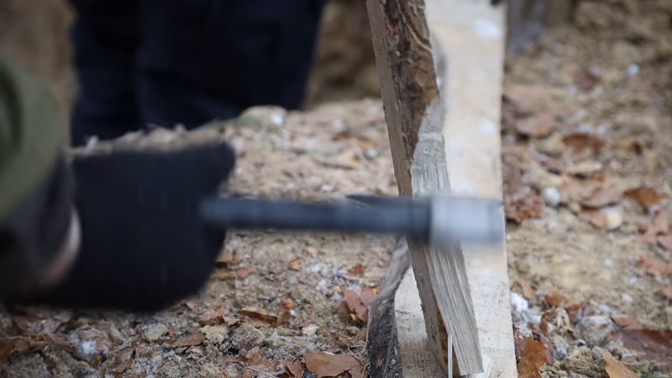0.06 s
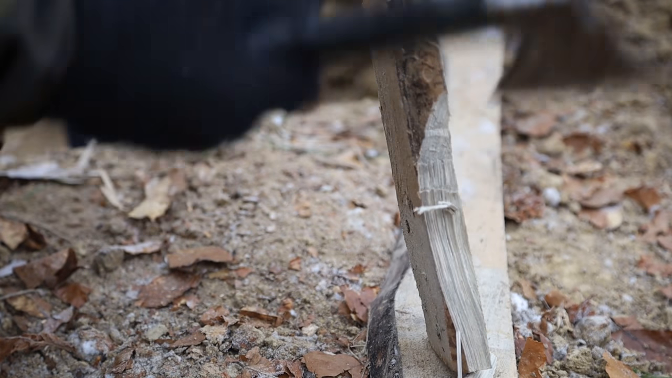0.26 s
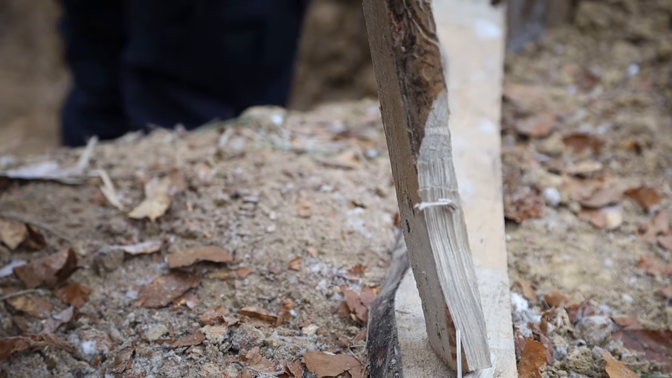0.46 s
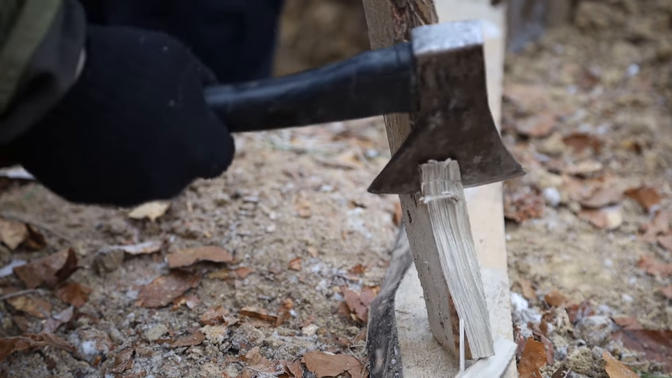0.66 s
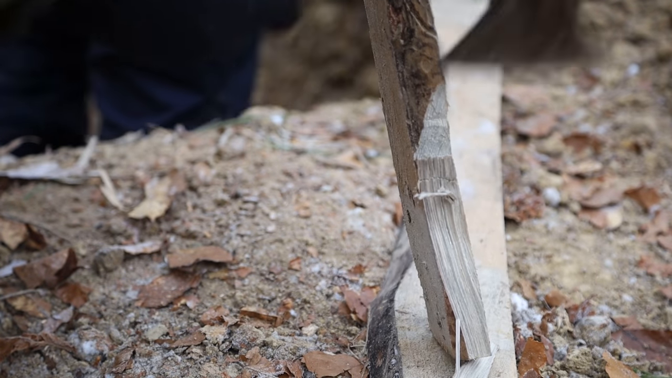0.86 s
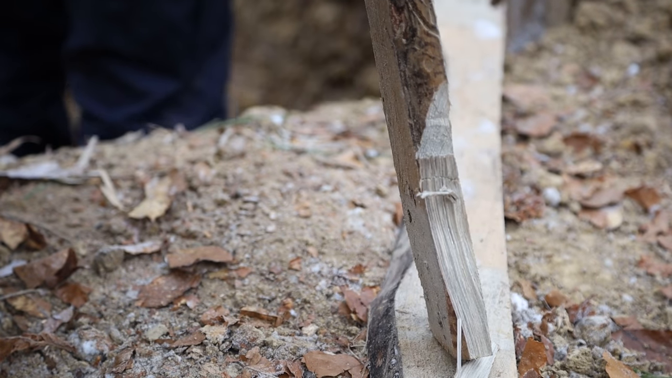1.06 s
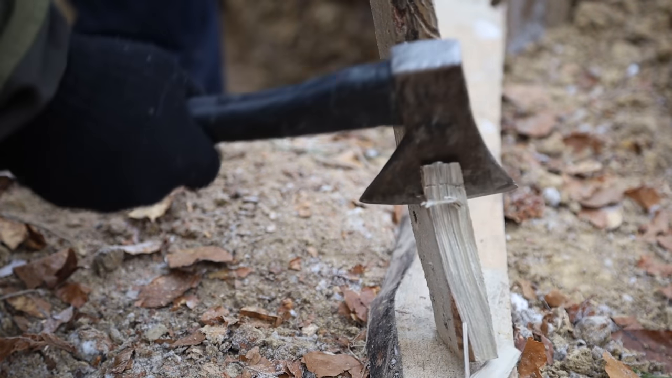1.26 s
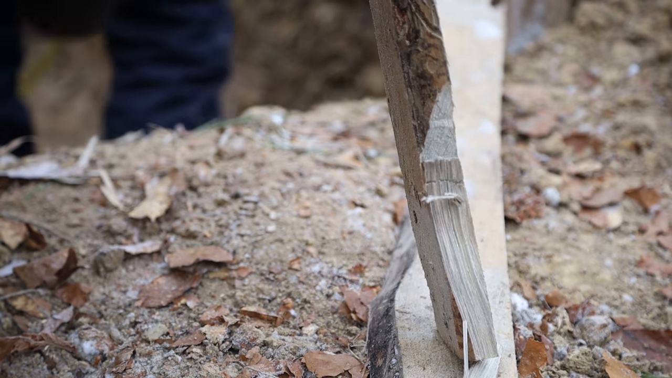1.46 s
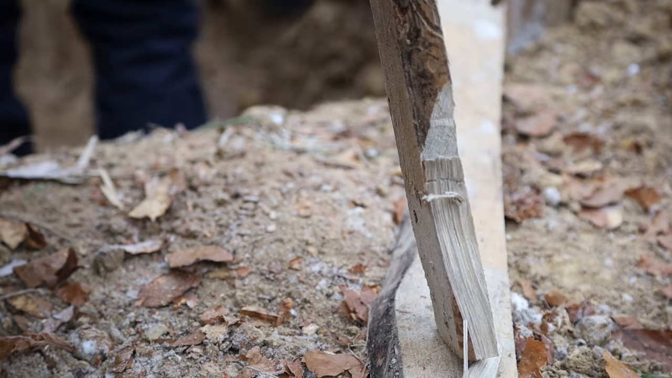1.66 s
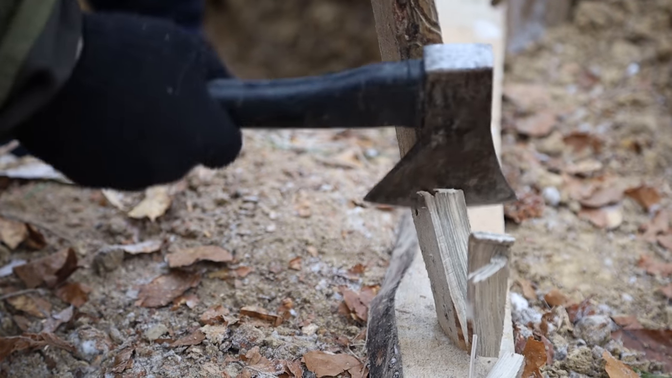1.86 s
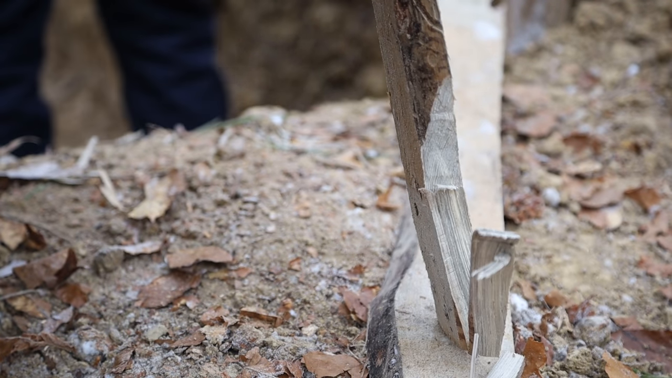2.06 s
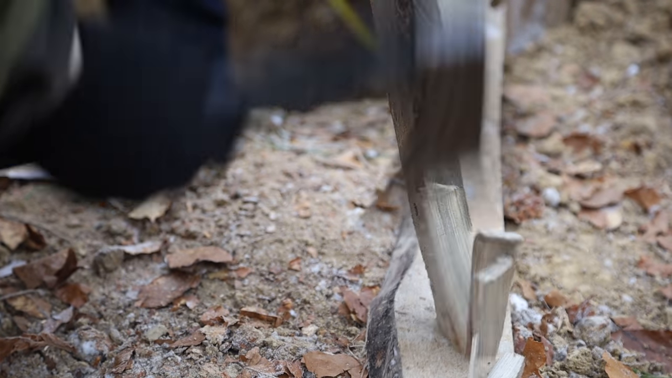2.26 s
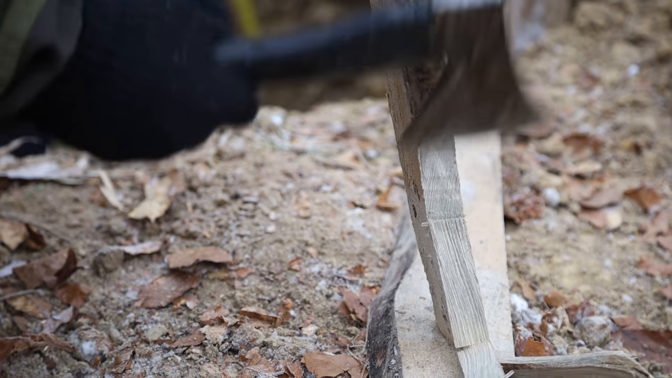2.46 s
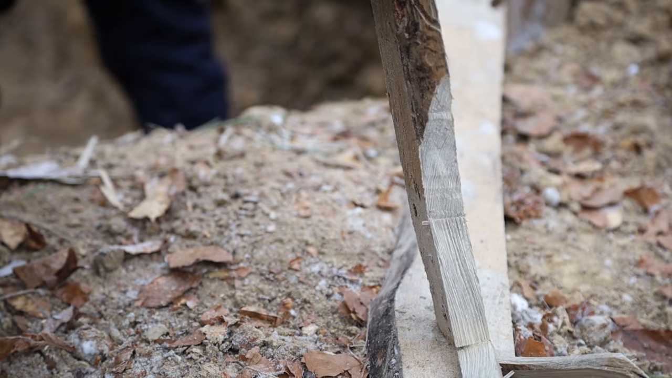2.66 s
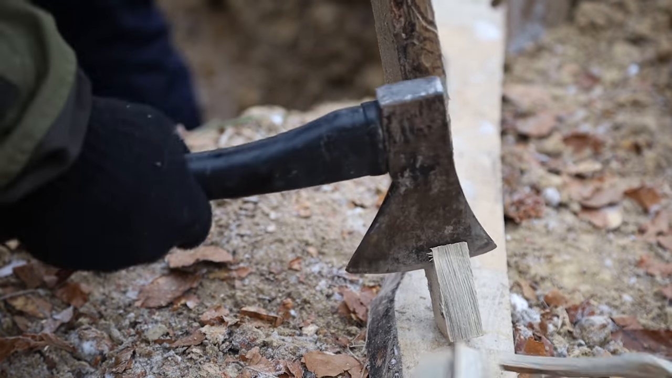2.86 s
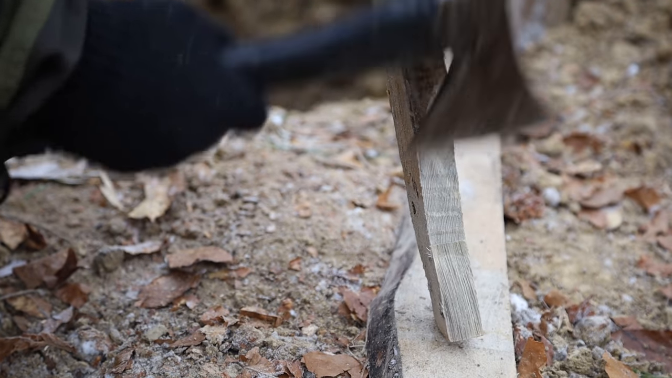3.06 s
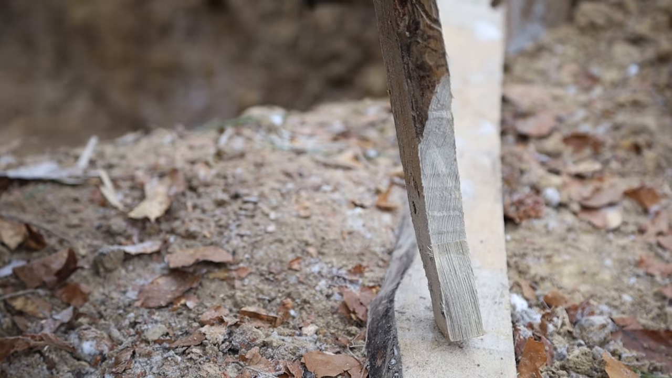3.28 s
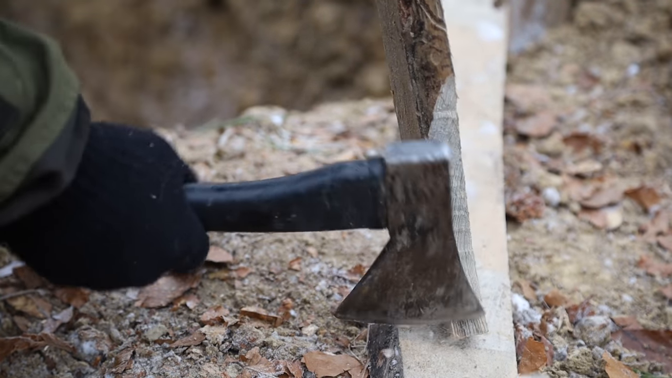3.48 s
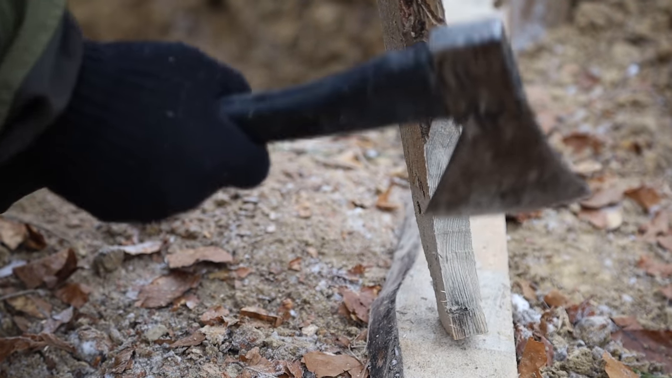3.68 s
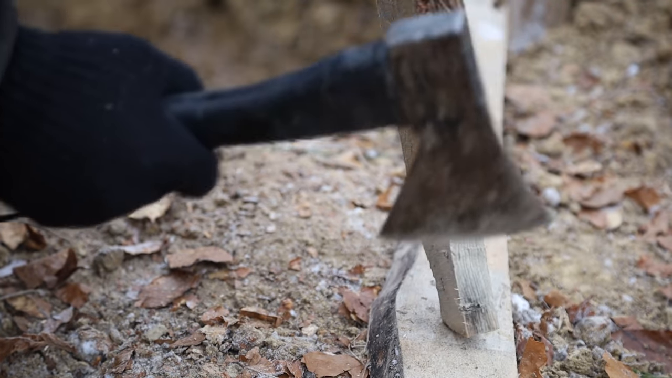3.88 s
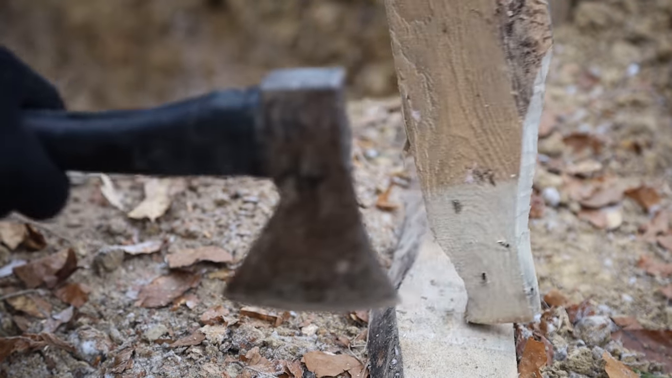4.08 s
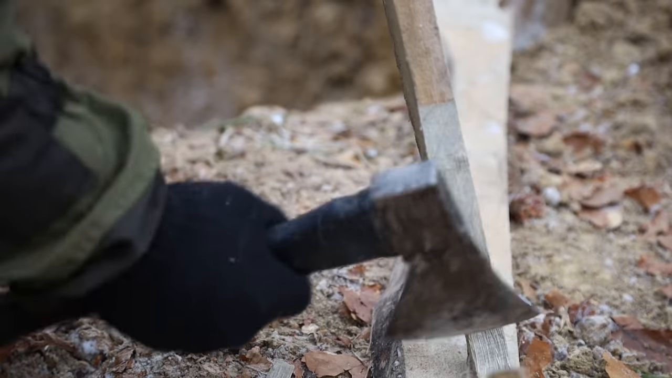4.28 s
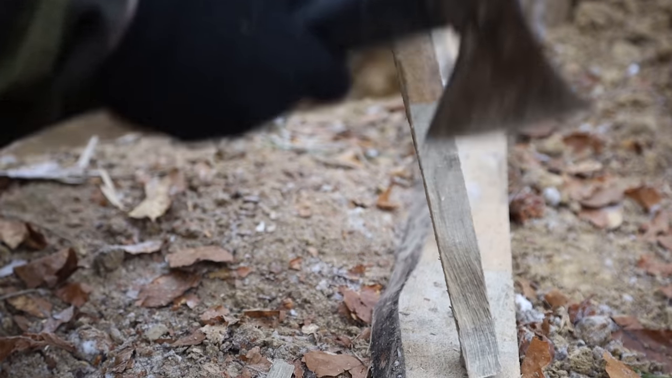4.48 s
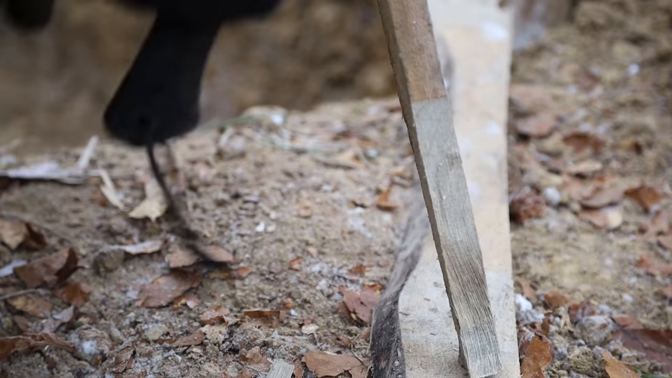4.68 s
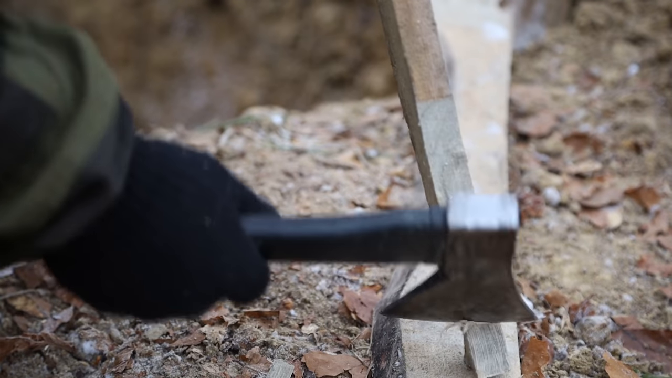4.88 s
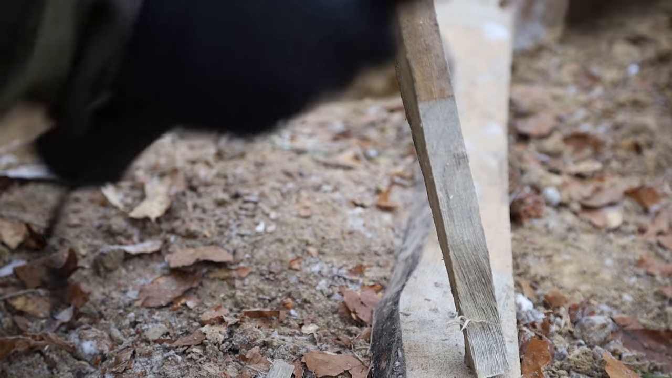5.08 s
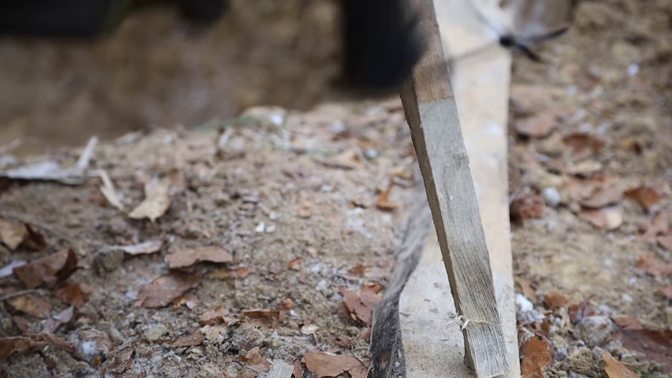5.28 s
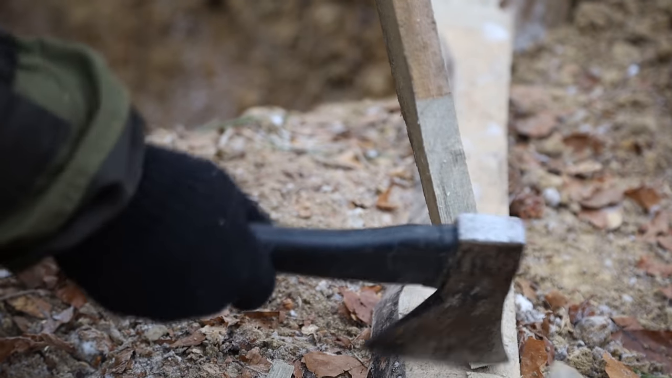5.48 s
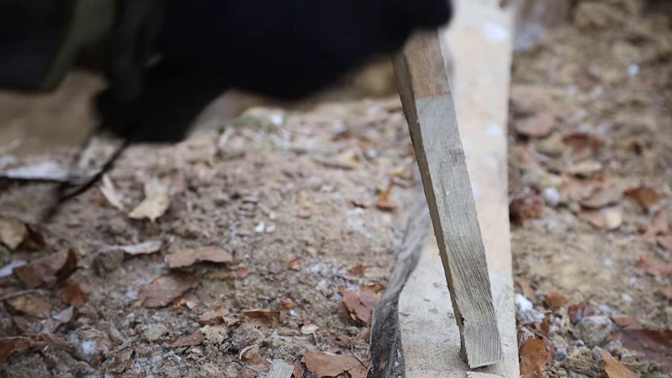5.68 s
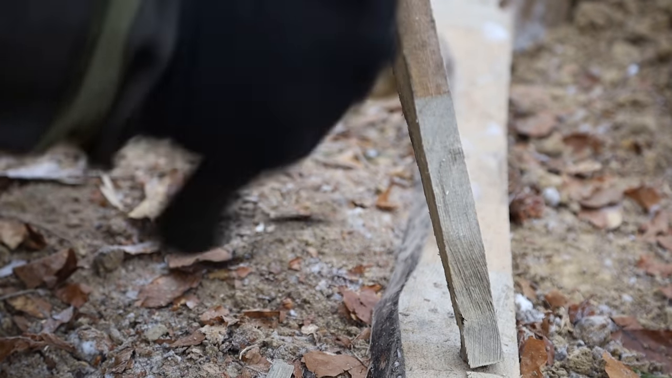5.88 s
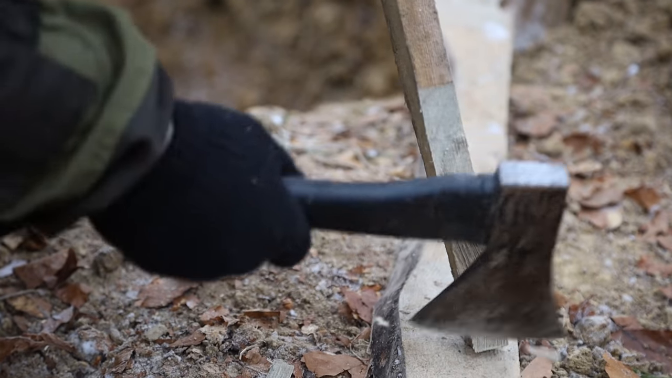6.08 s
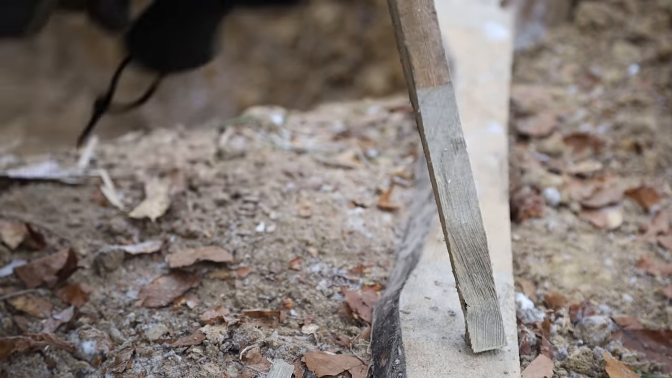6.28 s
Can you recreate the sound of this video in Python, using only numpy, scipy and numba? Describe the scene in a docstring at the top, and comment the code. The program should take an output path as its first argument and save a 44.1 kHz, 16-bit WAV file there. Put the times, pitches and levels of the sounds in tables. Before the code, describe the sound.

Close to the microphone, a hatchet hews a wooden stake propped on a plank. It opens with crisp splintering and cloth swishes, then come dry, punchy knocks at uneven gaps of about half a second, some doubled. Fibres rip as chips come loose, the stake scrapes and clatters as it is turned, and the blade sometimes rings thinly. Quiet outdoor air lies behind, and the loudest hits clip.

```python
"""A hatchet hews a wooden stake standing on a plank in a wood, close to a camera microphone.
Each blow is a cluster: tearing fibres are dense clicks, knocks ring the stake's modes, the freed blade rings on.
A sleeve and leaves swish as filtered noise; the stake, turned and dragged, scrapes as rubbed modes.
Behind lie quiet coloured air and a short scatter from ground and trunks. The recorder overloads and its
gain control ducks."""
import sys
import numpy as np
from scipy import signal
from scipy.fft import rfft, irfft, next_fast_len
from scipy.io import wavfile
from scipy.ndimage import uniform_filter1d
from numba import njit

SR = 44100
rng = np.random.default_rng(int(sys.argv[2]) if len(sys.argv) > 2 else 0)


def wav_out(sig):
    """Save sig, one row per channel (or a flat mono array), as 16-bit PCM at SR to the path in sys.argv[1]."""
    wavfile.write(sys.argv[1], SR, np.round(np.clip(np.atleast_2d(sig).T, -1, 1) * 32767).astype(np.int16))


N = 279594

# modes of the stake: (f/Hz, level/dB, t60/s before the ring length factor)
STAKE = [(150, -8, .08), (242, -6, .07), (360, -5, .07), (460, -4, .06), (590, -2, .06), (710, 0, .055),
         (835, -1, .055), (990, -3, .05), (1150, -4, .05), (1430, -6, .045), (1570, -6, .045),
         (1850, -10, .04), (2190, -13, .035), (3000, -16, .025)]
# modes of the hatchet blade: (f/Hz, level/dB, t60/s before the ring length factor)
BLADE = [(4810, -4.5, 0.14), (5450, -16.5, 0.012), (7300, -11.5, .03)]
# spectrum of cracking fibres: (f/Hz, relative level/dB per Hz)
CRACK = [(880, -23), (1500, 16.5), (2490, 8.5), (3130, 8.5), (6540, -1.5), (8650, 0.5), (9750, -27.5),
         (13500, -6.5), (16200, -32)]


def undb(db):
    """Decibels to gain."""
    return 10 ** (np.asarray(db) / 20)


def unit(x):
    """Scale to rms 1."""
    return x / np.sqrt(np.mean(x ** 2))


def coloured(points):
    """Noise with a spectrum drawn through (f/Hz, level/dB) points, rms 1."""
    hz, db = np.transpose(points)
    size = next_fast_len(N)
    f = np.fft.rfftfreq(size, 1 / SR) + 1  # + 1 Hz keeps the logarithm finite
    shape = undb(np.interp(np.log(f), np.log(hz), db))
    return unit(irfft(rfft(rng.standard_normal(size)) * shape, size)[:N])


def band(x, hz, width_hz):
    """Two-pole resonance, gain 1 at the centre."""
    return signal.lfilter(*signal.iirpeak(min(hz, .45 * SR), max(hz / width_hz, .3), fs=SR), x)


def ring(t, modes, gains, detune, linger=0.82):
    """Sum of decaying modes; linger is the ring length factor on every t60."""
    hz, db, t60 = np.array(modes, float).T[:, :, None]
    fade = undb(-60 * t / (t60 * max(linger, .2)))
    tone = np.sin(2 * np.pi * hz * detune[:, None] * t)
    return np.sum(gains[:, None] * undb(db) * tone * fade, axis=0)


def blade_ring(t):
    """The blade's modes, struck once and dying away."""
    return ring(t, BLADE, np.ones(len(BLADE)), np.ones(len(BLADE)))


def add(out, s, x):
    """Mix x into out at s seconds."""
    i = int(s * SR)
    out[i:i + len(x)] += x[:N - i]


def walk(count):
    """Random levels, count per second, slewed from one to the next; spread near 1."""
    k = int(SR / count)
    levels = np.repeat(rng.standard_normal(N // k + 1), k)
    return 1.25 * uniform_filter1d(levels, k)[:N]


def grains(rate, spread_db):
    """Random clicks, rate per second on average, a few much louder than the rest; rms 1."""
    size = undb(spread_db * rng.exponential(size=N)) * np.sign(rng.standard_normal(N))
    return unit(size * (rng.random(N) < rate / SR))


def wood_air():
    """Quiet air of the wood; its hiss drops out briefly after two heavy blows, treble most."""
    # spectrum of the air: (f/Hz, relative level/dB per Hz)
    air_points = [(12, -35), (20, -10.5), (102, -8), (146, -10.5), (286, -7.5), (348, -4.5), (461, -6.5),
                  (628, -7), (785, -3), (1450, -7), (3190, -14), (8500, -17), (13700, -26.5), (16200, -31)]
    # dropouts: (t/s, treble level/dB, time until the return/s, return/s)
    hush_rows = [(3.51, -7, 0.13, 0.12), (6.047, -13.5, 0.082, 0.088)]
    t = np.arange(N) / SR
    air = coloured(air_points) * undb(-48.5 + 0.32 * walk(count=5))
    low = signal.lfilter(*signal.butter(2, 1800., fs=SR), air)
    hush_db = 0
    for s, db, hold, back in hush_rows:
        hush_db = hush_db + np.interp(t, [s, s + .03, s + hold, s + hold + back], [0, db, db, 0])
    return low * undb(0.29 * hush_db) + (air - low) * undb(hush_db)


def swells(rows, tilt=0, offset_db=0.):
    """Gain of a series of rubs: each climbs to its peak and dies away; tilt weighs their brightness."""
    swell_db = 20  # what a rub gains over its rise and loses over its fall
    t, power = np.arange(0, N, 64) / SR, 0
    for s, db, rise, fall, *bright in rows:
        away = np.where(t < s, (s - t) / max(rise, .005), (t - s) / max(fall, .005))
        power = power + undb(db + offset_db + tilt * sum(bright) - swell_db * away) ** 2
    return np.interp(np.arange(N) / SR, t, np.sqrt(power))


def rustle():
    """Cloth swish in fixed resonances, an airy top, a crunchy middle, and dragged wood rubbing the stake modes."""
    # swishes of sleeve and leaves: (loudest at t/s, level/dB, rise/s, fall/s, brightness/dB: + airy, - crunchy)
    swish_rows = [(.133, -28, 0.051, 0.043, 5), (.165, -34.5, .04, 0.12, -2), (.21, -30.5, .015, .06, 0),
                  (.252, -43, .04, .015, -20), (.86, -44.5, .08, .1, -15), (.952, -30.5, 0.14, 0.9, -9),
                  (1.162, -36, .04, .09, -15.5), (1.27, -41, 0.05, 0.078, 1), (1.33, -32, .04, 0.11, 3),
                  (1.4, -33.5, .1, .12, -2.5), (1.492, -28.5, 0.083, 0.076, -0.5),
                  (1.614, -36, .05, .07, 0.5), (1.708, -30, .1, .1, -1.5), (1.77, -30, .1, .05, -7),
                  (1.96, -31, .14, .2, 1), (2.04, -29.5, 0.21, 0.1, 3), (2.092, -48.5, .15, .15, 13),
                  (2.17, -34, .05, .1, 2), (2.29, -37.5, .05, .06, -0.5), (2.504, -36, .04, .04, 0.5),
                  (3.098, -34.5, .04, .07, -3.5), (3.724, -39, .025, .05, -15), (3.802, -40.5, .05, .1, -1),
                  (3.968, -30, .02, .015, 1), (4.072, -47, .15, .3, -6), (4.524, -36.5, .1, .04, 4.5),
                  (4.566, -31.5, .015, .05, 5), (4.644, -41, .05, .08, 14), (4.76, -37.5, .1, .4, -2),
                  (5.048, -42, .04, .07, -5.5), (5.114, -39.5, .015, .025, -10), (5.28, -48.5, .5, .15, -2),
                  (6.288, -31.5, .02, 0.022, 7.5), (6.27, -54, 0.087, .1, 2)]
    # the stake scrapes on the plank: (loudest at t/s, level/dB, rise/s, fall/s)
    drag_rows = [(.14, -40.5, 0.089, 0.12), (.96, -40.5, 0.11, 0.5), (1.14, -36.5, 0.067, 0.13),
                 (1.33, -43.5, 0.15, 0.7), (1.45, -48.5, .1, 0.064), (1.77, -33, 0.067, 0.15),
                 (2.03, -37, 0.1, 0.19), (2.32, -39.5, 0.12, .05), (2.44, -40.5, 0.077, 0.055),
                 (3.07, -39, 0.084, .12), (3.15, -46, 0.069, 0.56), (3.802, -37, 0.075, 0.14),
                 (3.965, -46, .1, 0.12), (4.072, -37, 0.19, 0.18), (4.4, -35.5, 0.15, 0.067),
                 (4.5, -29, 0.025, 0.064), (4.53, -28.5, 0.07, 0.049), (4.566, -27.5, 0.014, 0.06),
                 (4.644, -24, 0.023, 0.035), (4.75, -35.5, 0.3, 0.28), (5.29, -46, 0.82, 0.044),
                 (6.33, -42.5, 0.068, .05)]
    # resonances of the cloth: (f/Hz, half the bandwidth/Hz, level/dB)
    cloth_bands = [(3930, 150, -17.5), (4620, 500, 10), (7580, 840, 17.5), (9100, 64, -8.5)]
    swish = swells(swish_rows)
    airy = swells(swish_rows, tilt=0.84, offset_db=-3.5)
    crunchy = swells(swish_rows, tilt=-0.53, offset_db=-10.5)
    dragged = swells(drag_rows)
    rub = rng.standard_normal(N) + .5 * grains(1500., spread_db=2.5)
    flicker = [undb(2.2 * walk(rate)) for rate in (14, 19, 25, 33, 45)]

    broad = unit(band(band(rub, 4380.0, 5300.0), 5730.0, 3600.0))
    cloth = np.zeros(N)
    for k, (f, half_width, db) in enumerate(cloth_bands):
        cloth += undb(db) * flicker[k % 3] * unit(band(rub, f, 2 * half_width))
    top = unit(band(band(rub, 8700.0, 8900.0), 18000.0, 4700.0)) * flicker[2]
    crunch = unit(band(band(rub, 2900.0, 2500.0), 2300.0, 3500.)) * flicker[3]
    drag = np.zeros(N)
    for k, (f, db, _) in enumerate(STAKE):
        drag += undb(1.3 * db) * flicker[k % 5] * unit(band(rub, f, f / 8))
    sleeve = unit(broad + 1.1 * unit(cloth)) * flicker[4]
    return swish * sleeve + airy * top + crunchy * crunch + dragged * unit(drag)


def tears(focus=0.55, blade_db=-62):
    """Dense clicks of fibres parting: a swell of the given length with a short tail, over a barely present blade ring."""
    # bursts of tearing fibres: (t/s, peak level/dB, brightest f/Hz, length/s)
    tear_rows = [(0.0834, -31, 6800, 0.0018), (0.092, -25.5, 4500, .00074), (0.1096, -9.5, 11600, 0.0015),
                 (0.115, -19.5, 9000, 0.00074), (0.1282, -6.5, 5500, 0.0012), (0.133, 2, 4860, 0.00045),
                 (0.1424, -17, 4830, .0012), (0.1845, -21, 12000, .001), (0.2105, -4, 6600, 0.0025),
                 (0.2298, -15.5, 4370, 0.011), (0.2428, -16.5, 6440, 0.0063), (0.6591, 3.5, 3150, 0.0028),
                 (0.7931, -22, 4060, 0.0026), (0.805, -24.5, 4660, 0.0038), (0.849, -21, 4400, 0.0011),
                 (1.2872, -2, 3500, 0.0049), (1.782, -6, 7750, 0.033), (1.798, -18, 8600, .014),
                 (1.822, 0, 5170, .003), (1.97, -24.5, 5540, 0.00082), (2.032, -11.5, 8460, 0.063),
                 (2.2485, -15.5, 8500, 0.018), (2.331, -17, 7600, 0.024), (2.3613, -6, 3370, 0.0064),
                 (2.9157, 5, 3210, 0.0044), (2.9365, -15.5, 7550, 0.0081), (3.0924, -25, 4480, 0.014),
                 (3.5118, -1.5, 3500, .0045), (3.7084, -23.5, 7620, .0015), (3.7114, -26.5, 3390, 0.0021),
                 (3.724, -23.5, 3260, 0.00057), (4.198, -30, 9500, 0.0026), (4.307, -13.5, 3100, 0.011),
                 (4.36, -26, 7400, 0.0036), (4.5361, -18.5, 4900, 0.00098), (4.9554, -1.5, 2600, 0.0038),
                 (5.4785, 3.5, 3800, 0.0044), (6.039, -15, 2820, 0.0037), (6.2422, -33, 8000, 0.0012),
                 (6.279, -21.5, 4970, 0.0053), (6.2907, -7.5, 4750, 0.00089)]
    out = np.zeros(N)
    fibres = .6 * grains(9000., spread_db=2.0) + coloured(CRACK)
    for s, db, hz, length in tear_rows:
        length = max(length, .0007)
        t = np.arange(int(6 * length * SR)) / (length * SR)  # in burst lengths
        i = int(s * SR)
        raw = np.diff(fibres[i - 1:i + len(t)])
        x = (1 - focus) * unit(raw) + focus * unit(band(raw, hz, hz / 3))
        swell = np.minimum(5 * t, 1) * np.exp(-np.maximum(t - 1, 0) * 2.2)
        x = x * swell[:len(x)]
        add(out, s, undb(db) * x / np.abs(x).max())
    blade = blade_ring(np.arange(SR // 20) / SR)
    return out + undb(blade_db) * signal.fftconvolve(out, blade)[:N]


def pings():
    """The blade springs free of the wood and rings in its own decaying modes."""
    # (t/s, level/dB)
    ping_rows = [(0.134, -26), (3.498, -23), (4.299, -12), (6.034, -31)]
    out = np.zeros(N)
    blade = blade_ring(np.arange(SR // 4) / SR)
    for s, db in ping_rows:
        add(out, s, undb(db) * blade)
    return out


def knocks(blade_db=-42, gain_db=-0.5, thud_db=-26, thud_hz=76.0, thud_t60=0.1):
    """Each knock rings the stake modes near its pitch; the loose stake chatters on, fibres crack, the ground thuds."""
    # knocks on wood: (t/s, level/dB before gain_db, loudest f/Hz, crack level/dB re knock,
    # breadth/octaves, ring length factor: longer when the stake hangs free)
    knock_rows = [(0.163, -28, 1500, -2, 0.49, 0.35), (0.2045, -20.5, 890, 2.5, 0.083, 0.54),
                  (0.234, -28.5, 910, -9, 0.21, 0.64), (0.464, -43, 423, -19, 0.36, 0.41),
                  (0.6568, 6.5, 687, -1.5, 0.59, 0.15), (0.751, -37, 1080, -16, .39, 0.38),
                  (1.126, -22, 190, -27, 1, 0.18), (1.152, -28.5, 182, -24, 0.37, 0.58),
                  (1.2873, 0, 610, 0, 0.3, 0.27), (1.293, -2.5, 713, -15, 0.53, 0.27),
                  (1.306, -19, 746, -7.5, 0.96, .9), (1.824, -1, 684, 4, 1, 0.38),
                  (1.829, 0, 860, -14.5, 0.26, 0.18), (1.848, -4, 825, -22, 0.74, 0.24),
                  (2.359, 2, 490, 7, 0.36, 0.18), (2.364, -1.5, 500, -15, 0.67, 1.1),
                  (2.381, -9.5, 800, -1, 0.76, 0.72), (2.53, -29.5, 189, -1.5, 0.84, 1.75),
                  (2.916, 6, 676, -7, 0.22, 0.86), (2.92, 4, 825, -14.5, 0.39, 0.15),
                  (2.956, -19.5, 1240, 0, 0.25, 1), (2.966, -19.5, 680, -3.5, .32, 0.69),
                  (3.039, -23.5, 1050, 3, 0.23, 0.46), (3.074, -33.5, 680, -14, 0.36, 1.1),
                  (3.087, -26, 700, -13, 0.36, 0.59), (3.119, -39, 524, 15, 0.54, 0.72),
                  (3.166, -30, 160, -11, .3, 2.3), (3.209, -23.5, 151, -10, 0.75, 0.67),
                  (3.415, -26.5, 284, -7.5, 0.62, 0.92), (3.4971, 10, 727, -11, 0.37, 0.2),
                  (3.508, -14.5, 710, 15.5, 0.96, 1), (3.5243, 11, 990, -18.5, 0.48, 0.38),
                  (3.593, -38.5, 285, 5, 0.68, 0.47), (3.747, -30, 252, 8, .95, 0.67),
                  (3.795, -16, 221, -18.5, 0.37, 0.48), (3.827, -26.5, 193, 6.5, 0.57, 2),
                  (3.914, -37, 1210, 9, 0.35, 0.61), (3.965, -21.5, 270, 3.5, 0.24, 0.41),
                  (4.051, -32, 1090, 0.5, .95, 0.23), (4.156, -27, 590, -22, 0.23, 4.2),
                  (4.297, 3.5, 710, 3, .22, 0.27), (4.3252, 9, 1280, -8.5, 0.77, 0.35),
                  (4.453, -21.5, 940, -17, 1, 1.1), (4.494, -12, 450, -16.5, 1, 1.6),
                  (4.524, -7, 1035, -35, 0.23, 0.52), (4.538, -18, 352, -22, 0.087, 1.5),
                  (4.631, -18.5, 700, -7, .7, 1.8), (4.719, -32, 363, -23, 0.14, 1.7),
                  (4.787, -13.5, 450, -20, 0.84, 1.84), (4.804, -17, 756, -23, 1, 1),
                  (4.9494, -7.5, 790, -2.5, 0.33, 1.9), (4.961, 4, 730, -7, 1, 0.3),
                  (4.983, -13.5, 162, -13, 0.64, 0.6), (5.4712, 0, 724, 4.5, 0.11, 0.95),
                  (5.4937, 3.5, 893, -27.5, .5, .55), (5.739, -42, 1030, 9.5, .31, .79),
                  (5.9595, -36.5, 1155, 3, 0.2, 0.78), (6.0324, 6, 720, 1, 0.087, 0.61),
                  (6.0454, 10, 1170, -13.5, 0.27, 0.55), (6.288, -34.5, 913, 10.5, 0.17, 0.82),
                  (6.315, -32, 1120, -10, 1, 0.44)]
    chatter_db, chatter_s = -13.5, 0.016  # level re a knock of 0 dB, duration
    chatter_slope = -0.24  # dB per dB of knock: light handling is more chatter than knock
    out, t = np.zeros(N), np.arange(SR // 6) / SR
    crack = coloured(CRACK)
    judder = grains(2600., spread_db=3.5)
    ground = unit(band(rng.standard_normal(N), thud_hz, 100.0))
    mode_hz = np.array(STAKE)[:, 0]
    chance = rng.standard_normal((len(knock_rows), 2, len(STAKE)))
    blade = blade_ring(t)
    for (s, db, hz, crack_db, breadth, linger), (size, tune) in zip(knock_rows, chance):
        # where it is struck decides which modes speak
        near = np.exp(-np.abs(np.log2(mode_hz / hz)) / max(breadth, .1))
        wood = ring(t, STAKE, near * undb(2. * size), 1 + .02 * tune, linger)
        push = np.hanning(int(.14 * SR / hz) + 3)  # a soft contact lasts part of a cycle
        wood = np.convolve(wood, push)[:len(t)]
        # a thin stake radiates little bass
        wood = signal.lfilter(*signal.butter(2, hz / 3, "high", fs=SR), wood)

        i = min(int(s * SR), N - len(t))  # keeps the noise slices whole near the end
        shakes = judder[i:i + len(t)] * np.exp(-(t / chatter_s) ** 2)
        chatter = signal.fftconvolve(shakes, wood)[:len(t)]
        chatter = chatter / np.sqrt(np.sum(wood ** 2)) * undb(chatter_db + chatter_slope * db)
        edge = crack[i:i + len(t)] * undb(-60 * t / .018)
        edge = edge / np.abs(edge).max() + undb(blade_db) * blade
        thud = undb(thud_db) * ground[i:i + len(t)] * np.minimum(t / 0.023, 1) * undb(-60 * t / thud_t60)
        hit = wood / np.abs(wood).max() + chatter + thud + undb(crack_db) * edge
        add(out, s, undb(db + gain_db) * hit)
    return out


def woods(dry, t60=0.099, hz=825.0, wet_db=-23):
    """A short dull scatter from the ground and trunks: the blows convolved with decaying band noise."""
    t = np.arange(SR // 3) / SR
    tail = band(rng.standard_normal(len(t)), hz, 1100.0) * undb(-60 * t / t60)
    return signal.fftconvolve(dry, tail / np.sqrt(np.sum(tail ** 2)))[:N] * undb(wet_db)


def scene():
    """Blows, tearing and rustle close by, over the quiet air of the wood."""
    blows = knocks() + tears() + pings()
    return (blows + woods(blows) + rustle() + wood_air())[None]


@njit
def follow(x, attack, release):
    """Peak follower: fast up, slow down."""
    e, out = 0., np.empty(len(x))
    for i in range(len(x)):
        e += (abs(x[i]) - e) * (attack if abs(x[i]) > e else release)
        out[i] = e
    return out


def record(dry, top_db=-17, ratio=23.0, attack_s=0.012, release_s=0.11):
    """Gain control that reacts too late to stop the blows from clipping, then the top cut."""
    top_hz = 16200
    e = follow(dry[0], 1 / (attack_s * SR), 1 / (release_s * SR))
    gain = np.minimum(undb(top_db) / (e + 1e-9), 1) ** (1 - 1 / max(ratio, 1))
    lag = SR // 60  # the gain comes 1/60 s late
    gain = np.concatenate([np.ones(lag), gain[:N - lag]])
    clipped = np.clip(dry * gain, -1, 1)
    return signal.sosfilt(signal.ellip(8, .2, 60, top_hz, fs=SR, output="sos"), clipped)


dry = scene()
out = record(dry)
wav_out(out)
```